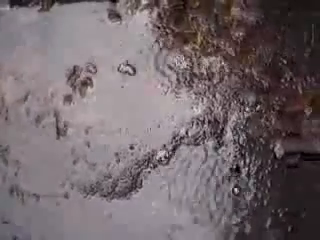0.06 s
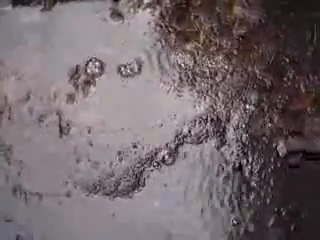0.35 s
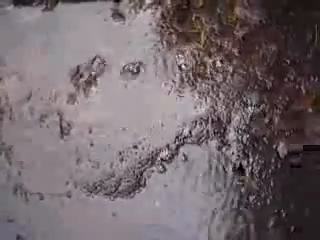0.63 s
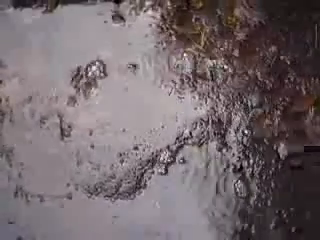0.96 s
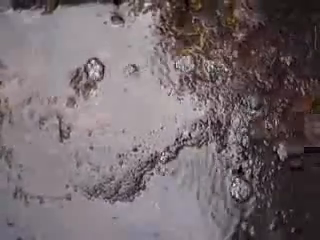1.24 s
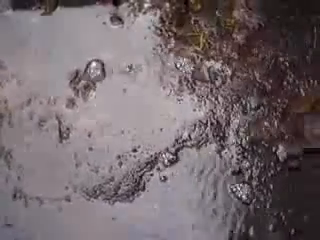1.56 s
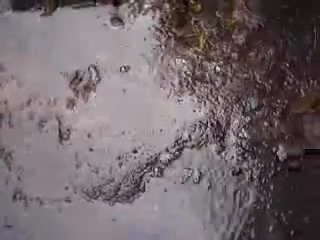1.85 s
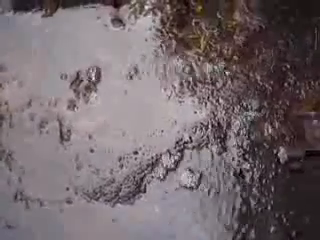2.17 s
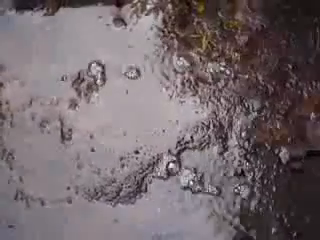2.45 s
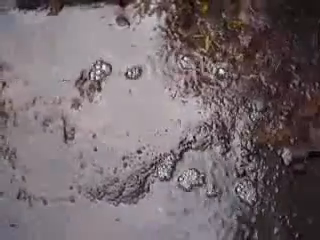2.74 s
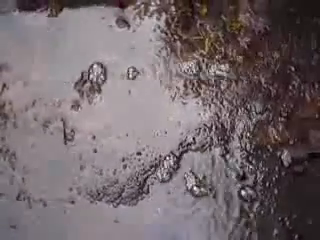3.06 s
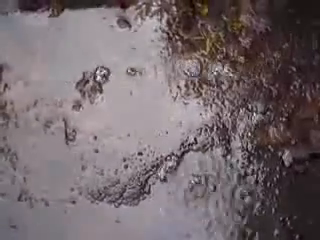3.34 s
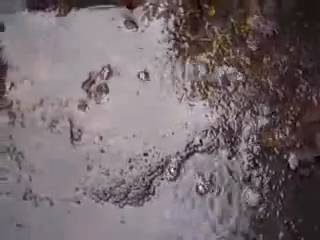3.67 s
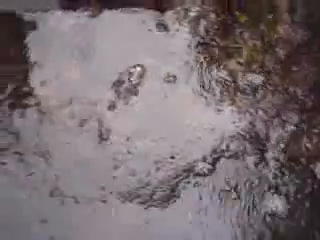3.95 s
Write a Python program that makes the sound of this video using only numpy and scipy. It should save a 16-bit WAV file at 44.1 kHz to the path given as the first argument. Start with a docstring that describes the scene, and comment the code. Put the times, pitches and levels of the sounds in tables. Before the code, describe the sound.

Murky water bubbles and gurgles steadily, with popping foam over a deep hum.

```python
"""A dense churn of bubbles, as gas boils up through shallow flood water.
Each bubble rings as a resonator, its gas the spring and the water around it the mass: large ones
give single blups that rise in pitch, small ones pop and crackle as foam.
A deep hum, like that of a distant pump, swells and fades beneath it.
All is heard through the narrow band of a small camera, which adds its own faint hiss."""
import sys
import numpy as np
from scipy import signal
from scipy.fft import rfft, irfft, next_fast_len
from scipy.io import wavfile
from scipy.ndimage import map_coordinates

SR = 44100
rng = np.random.default_rng(int(sys.argv[2]) if len(sys.argv) > 2 else 0)


def master_out(mix):
    """Clip the mix to full scale and print it as 16-bit PCM to the path in sys.argv[1]."""
    frames = np.transpose(np.atleast_2d(mix))
    ceiling = np.clip(frames, -1, 1)
    pcm = np.round(ceiling * 32767).astype(np.int16)
    wavfile.write(sys.argv[1], SR, pcm)


N = 176400

# Spectrum of foam and spray. Each row: frequency in Hz, relative level in dB.
FOAM_SPECTRUM = [(600, -20), (1200, 1.5), (1450, 4), (1750, -1), (2150, 3), (2600, 2), (3050, 1),
                 (3500, -4), (3820, -1), (4100, -12)]


def amp(db):
    """The decibel scale: every 20 dB is a factor of ten in amplitude."""
    return 10 ** (np.asarray(db) / 20)


def curve(rows):
    """Linear interpolation of (seconds, value) rows gives one value per sample."""
    return np.interp(np.arange(N) / SR, *np.transpose(rows))


def wobble(rate):
    """Smooth random modulation: a spline through Gaussian knots, `rate` of them a second."""
    knots = rng.standard_normal(int(N * rate / SR) + 4)
    return map_coordinates(knots, [np.arange(N) * rate / SR])


def filtered(x, response):
    """Linear filtering multiplies the spectrum by a frequency response."""
    size = next_fast_len(N + SR // 2)
    return irfft(rfft(x, size) * response(np.fft.rfftfreq(size, 1 / SR)), size)[:N]


def coloured(x, spectrum):
    """Spectral shaping by (Hz, dB) rows, with the result scaled to rms 1."""
    knot_hz, db = np.transpose(spectrum)
    shaped = filtered(x, lambda hz: amp(np.interp(np.log(hz + 1), np.log(knot_hz), db)))
    return shaped / np.sqrt(np.mean(shaped ** 2) + 1e-20)


def echo(x):
    """Diffuse reflection from the surroundings: convolution with exponentially decaying noise."""
    level_db, t60_s, delay_s = -14, .08, .008
    t = np.arange(SR // 3) / SR
    tail = rng.standard_normal(len(t)) * amp(-60 * t / t60_s) * (t > delay_s)
    return amp(level_db) * signal.fftconvolve(x, tail / np.linalg.norm(tail))[:N]


def bubbles(rows, samples=3000):
    """Bubble resonance: each sine swells and dies away, its pitch rising as the bubble surfaces."""
    start_s, hz, peak_db, swell_s, rise_hz = np.transpose(rows)[:, :, None]
    age = np.arange(samples) / SR / swell_s  # 1 at the peak
    pitch = hz + rise_hz * (1 - np.exp(-age / 1.16))  # shoots up, then levels off
    envelope = amp(peak_db) * (age * np.exp(1 - age)) ** 1.5
    rings = envelope * np.sin(2 * np.pi * np.cumsum(pitch, axis=1) / SR)
    at = np.round(np.abs(start_s) * SR).astype(int) + np.arange(samples)
    return np.bincount(at.ravel(), rings.ravel(), N)[:N]


def swarm(low_hz, high_hz, spread_db, swell_cycles, rise_share, count, samples):
    """Superposition of random bubbles: all ring for about as many cycles, so small ones die sooner."""
    jitter, pitch, strength, climb = rng.random((count, 4)).T
    start_s = (np.arange(count) + 20 * jitter) % count / count * N / SR
    hz = low_hz * (high_hz / low_hz) ** pitch
    db = spread_db * strength + 20 * np.log10(hz / low_hz)
    return bubbles(np.transpose([start_s, hz, db, swell_cycles / hz, rise_share * climb * hz]), samples)


def hum():
    """Amplitude modulation: a deep, nearly pure tone swells and fades under a faint, steady octave."""
    # Each row: time in seconds, level in dB.
    levels = [(.06, -14), (.19, -18), (.26, -35), (.45, -28.5), (.62, -21), (.8, -17), (.95, -18),
              (1.2, -12.5), (1.42, -17), (1.52, -13.3), (1.84, -17), (1.97, -26.5), (2.2, -32.5),
              (2.32, -21.5), (2.66, -16), (2.88, -19), (3.08, -24), (3.22, -38), (3.4, -28), (3.52, -35),
              (3.65, -27), (4, -27)]
    # Each row: time in seconds, frequency in Hz.
    pitches = [(0, 61.16), (1, 59.55), (1.5, 61), (2.2, 60.86), (2.8, 61.7), (3.3, 62.26), (4, 61.6)]
    waver_db, octave_db = .83, -49
    phase = 2 * np.pi * np.cumsum(curve(pitches)) / SR
    fundamental = amp(curve(levels) + waver_db * wobble(21)) * np.sin(phase)
    return np.sqrt(2) * (fundamental + amp(octave_db) * np.sin(2 * phase))


def foam():
    """Tiny bubbles resonate high: they crackle in flurries over a soft fizz, blurred by their echo."""
    # Strength of the foam. Each row: time in seconds, gain in dB.
    froth = [(0, 0.8), (.28, -.7), (.47, 1), (.69, 2.5), (.8, -0.5), (1.1, -0.9), (1.8, -0.5), (2.1, 0.5),
             (2.59, -.8), (2.9, .5), (3.03, -2), (3.45, -0.1), (3.8, -1)]
    grains = swarm(1150, 4243, spread_db=18, swell_cycles=3.35, rise_share=.12, count=2200, samples=800)
    crackle = amp(-40.5 + 1.5 * wobble(50)) * coloured(grains + echo(grains), FOAM_SPECTRUM)
    fizz = amp(-37 + 1.1 * wobble(70)) * coloured(rng.standard_normal(N), FOAM_SPECTRUM)
    return amp(curve(froth)) * (crackle + fizz)


def pops():
    """Impulsive excitation: a bursting bubble rings briefly and roughly and throws a little spray."""
    # Each row: start in seconds, starting pitch in Hz, level in dB, swell time in seconds.
    bursts = [(.452, 3550, -32, .0015), (.552, 3600, -31, .0018), (.622, 2900, -27, .0015),
              (.702, 2300, -21, .0016), (.822, 3550, -29, .0012), (.966, 2560, -23.5, .0014),
              (1.060, 1480, -25, .002), (1.435, 1450, -26, .0025), (1.442, 2380, -22, .003),
              (1.946, 1400, -24, .003), (1.951, 3600, -32, .0015), (1.966, 3650, -32, .0015),
              (2.049, 1480, -27, .002), (2.14, 2250, -26, .0012), (2.159, 2550, -26, .0015),
              (2.389, 1760, -25, .0022), (2.533, 1500, -26, .0027), (2.636, 1420, -21.5, .002),
              (2.665, 2560, -26, .0016), (2.726, 1390, -26, .003), (2.852, 2650, -23, .0013),
              (2.868, 3700, -31, .0014), (2.893, 1430, -29, .004), (3.127, 1540, -28, .0025),
              (3.167, 3650, -30, .0014), (3.372, 3700, -31.5, .0015), (3.443, 2600, -23, .0017),
              (3.525, 2780, -24, .0014)]
    rise_share, spray_db, spray_peak_s = .057, -7, .004
    start_s, hz, db, swell_s = np.transpose(bursts)
    rings = bubbles(np.transpose([start_s, hz, db, swell_s, rise_share * hz]))
    roughness = np.cos(.5 * wobble(900))
    age = np.maximum(np.arange(N) / SR - start_s[:, None], 0) / spray_peak_s
    spray_envelope = amp(db + spray_db) @ (age * np.exp(1 - age))
    return rings * roughness + spray_envelope * coloured(rng.standard_normal(N), FOAM_SPECTRUM)


def boil():
    """Flow noise: welling water rumbles, churns and gurgles with bubbles, louder as the flow grows."""
    # Strength of the flow. Each row: time in seconds, level in dB, taken relative to its mean.
    flow = [(0, -27.5), (.25, -26.5), (.6, -25.5), (1, -27), (1.5, -27), (1.9, -28.5), (2.5, -29),
            (2.85, -29), (3.35, -30), (3.7, -30.5), (3.9, -28.5), (4, -28)]
    # Three spectra. Each row: frequency in Hz, relative level in dB.
    rumble_spectrum = [(10, -36), (21, -5.5), (31, -3.5), (43, 0), (62, 2.5), (82, 0), (95, -4),
                       (122, -0.5), (160, -9), (260, -15), (600, -75)]
    churn_spectrum = [(100, -40.5), (190, -1), (300, -4), (345, -2.5), (375, 0), (410, -5), (480, -8),
                      (620, -1), (830, 0.5), (1020, -6), (1250, -22), (1800, -20), (4000, -47)]
    gurgle_spectrum = [(150, -12.5), (300, -0.5), (470, -2), (620, 2), (780, -6), (835, 5), (890, -7.5),
                       (1100, -2), (1280, -18.5), (2500, -46.5)]
    flow_db = curve(flow)
    flow_db -= flow_db.mean()
    rumble = amp(-31.5 + 1.37 * flow_db) * coloured(rng.standard_normal(N), rumble_spectrum)
    churn = amp(-28 + .39 * wobble(24.92)) * coloured(rng.standard_normal(N), churn_spectrum)
    rings = swarm(233.8, 1125, spread_db=12, swell_cycles=2.53, rise_share=.35, count=2000, samples=3000)
    gurgle = amp(-32.5) * coloured(rings, gurgle_spectrum)
    return rumble + amp(flow_db) * (churn + gurgle)


def blups():
    """Large bubbles resonate low; they surface at scattered places, so each has its own echo."""
    # Each row: start in seconds, starting pitch in Hz, peak level in dB, swell time in seconds,
    # pitch rise in Hz.
    large_bubbles = [(.046, 590, -14, .004, 30), (.092, 580, -20, .004, 60), (.227, 600, -21, .004, 40),
                     (.260, 520, -15, .004, 330), (.492, 750, -13, .005, 100), (.593, 800, -24.5, .006, 30),
                     (1.351, 520, -19, .003, 150), (1.359, 630, -15, .007, 260),
                     (1.392, 900, -19.5, .004, 160), (1.516, 720, -16.5, .006, 170),
                     (1.908, 740, -23, .007, 90), (2.005, 740, -21, .006, 100), (2.164, 760, -20, .004, 80),
                     (2.358, 600, -18, .007, 290), (2.492, 650, -21, .004, 110),
                     (2.608, 780, -20, .004, 50), (2.770, 700, -18, .003, 80), (2.857, 480, -20, .003, 150),
                     (2.863, 750, -15, .007, 120), (2.879, 900, -23.5, .005, 100),
                     (2.962, 700, -16.5, .004, 170), (3.064, 620, -16.5, .004, 300),
                     (3.213, 560, -19.5, .004, 70), (3.853, 560, -19.5, .008, 280),
                     (3.912, 540, -21, .005, 100)]
    rings = [bubbles([row]) for row in large_bubbles]
    return sum(ring + echo(ring) for ring in rings)


def scene():
    """Superposition: hum, boiling water, blups, foam and echoing pops add in one channel."""
    bursts = pops()
    return (hum() + boil() + blups() + foam() + bursts + echo(bursts))[None]


def record(dry):
    """Band limiting: the camera cuts the treble steeply and adds an even hiss that reaches higher."""
    band_hz, hiss_top_hz, hiss_db = 4120, 10050, -53
    narrow = filtered(dry[0], lambda hz: 1 / np.sqrt(1 + (hz / band_hz) ** 200))
    hiss = amp(hiss_db) * rng.standard_normal(N)
    return filtered(narrow + hiss, lambda hz: hz < hiss_top_hz)[None]


dry = scene()
out = record(dry)
master_out(out)
```